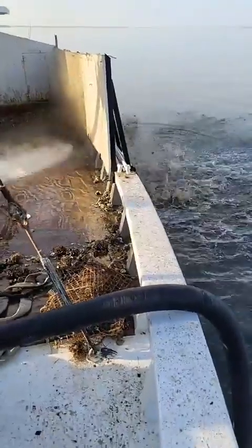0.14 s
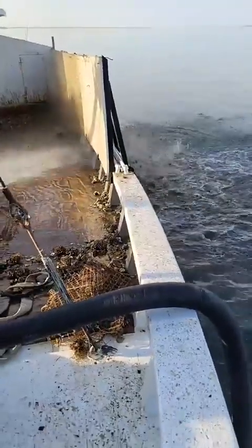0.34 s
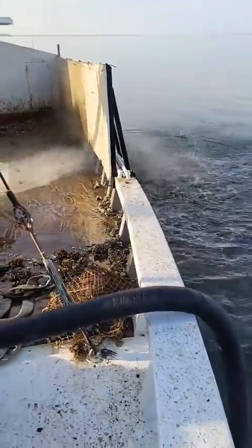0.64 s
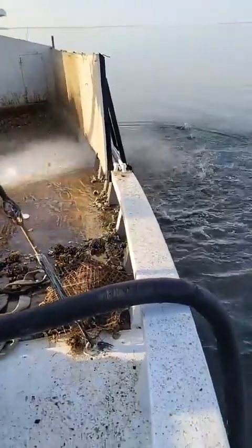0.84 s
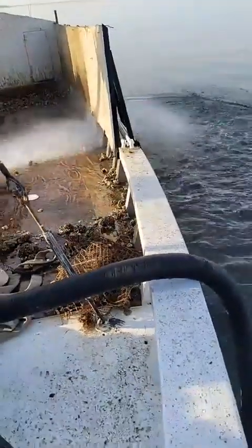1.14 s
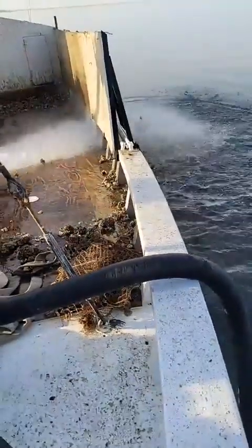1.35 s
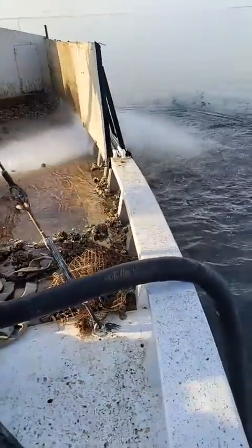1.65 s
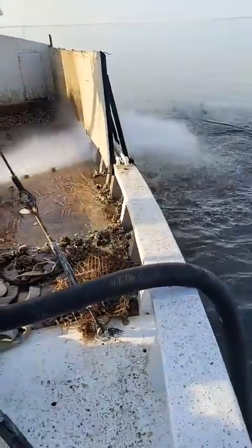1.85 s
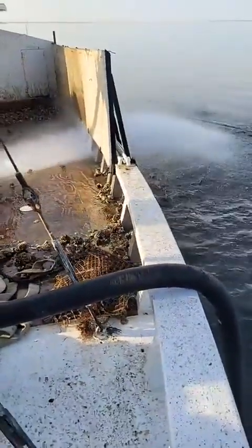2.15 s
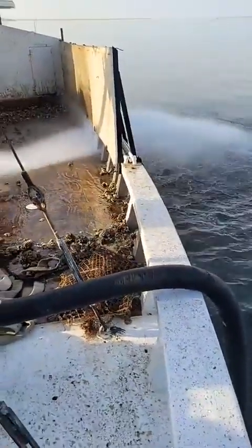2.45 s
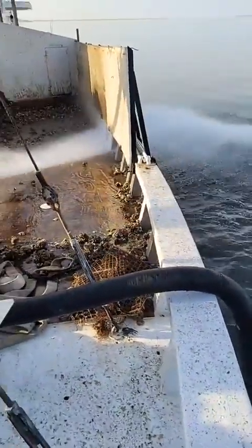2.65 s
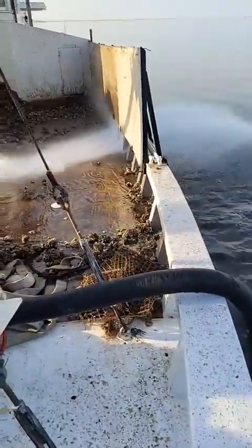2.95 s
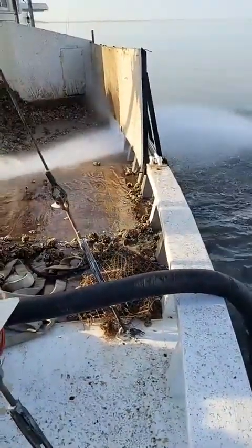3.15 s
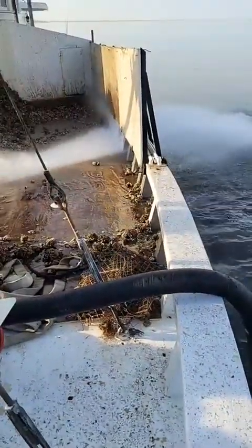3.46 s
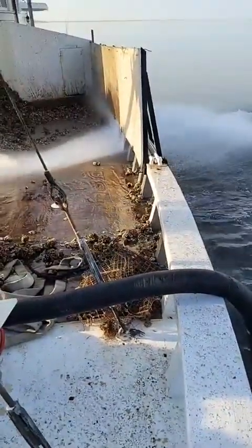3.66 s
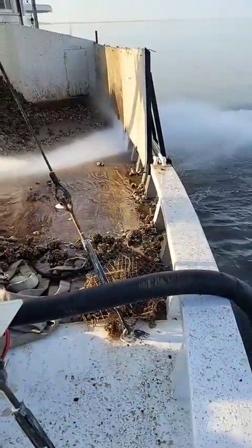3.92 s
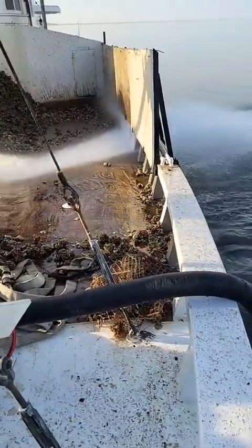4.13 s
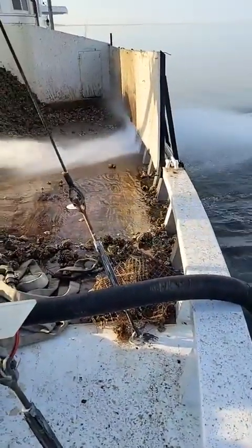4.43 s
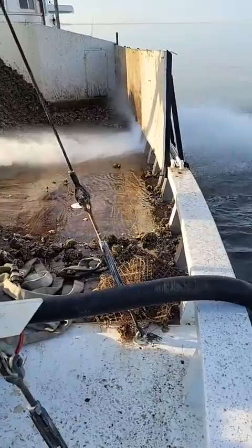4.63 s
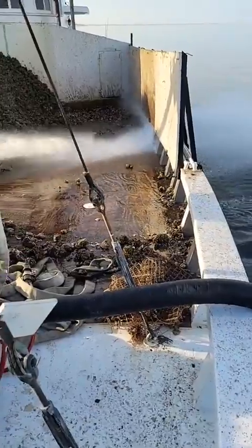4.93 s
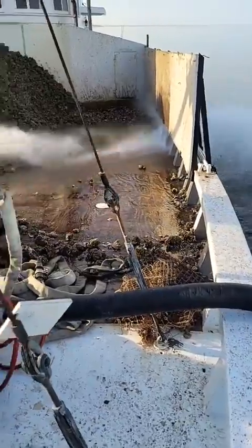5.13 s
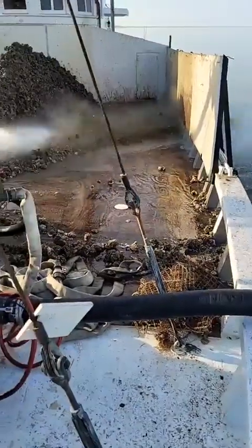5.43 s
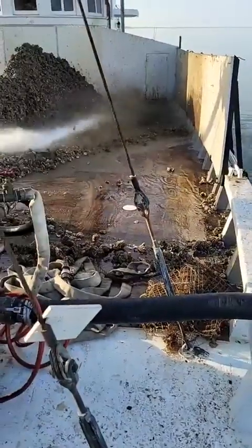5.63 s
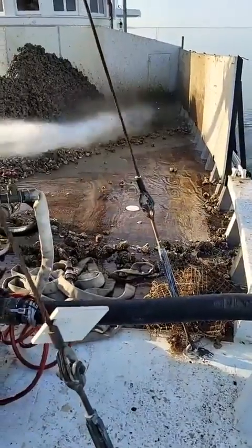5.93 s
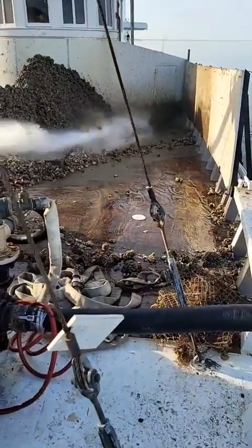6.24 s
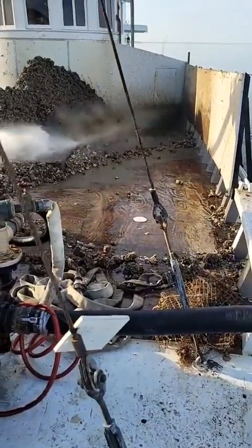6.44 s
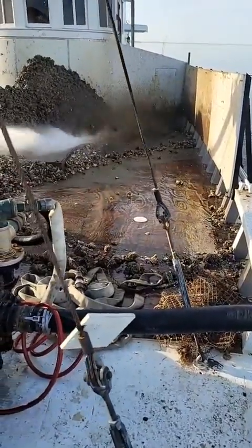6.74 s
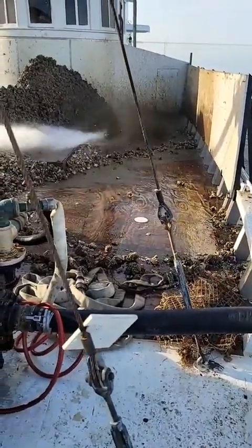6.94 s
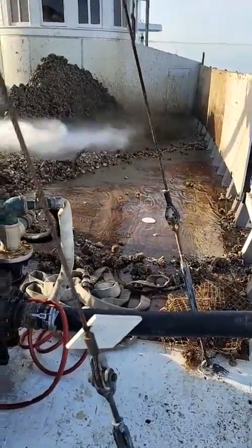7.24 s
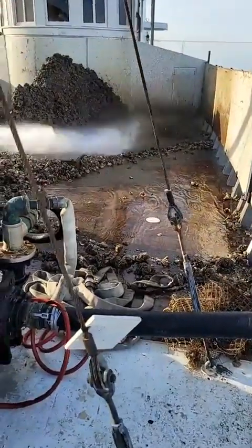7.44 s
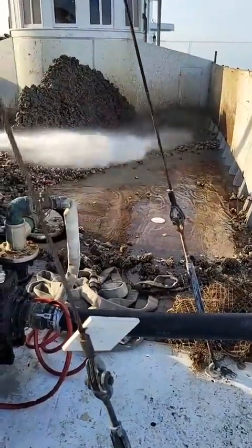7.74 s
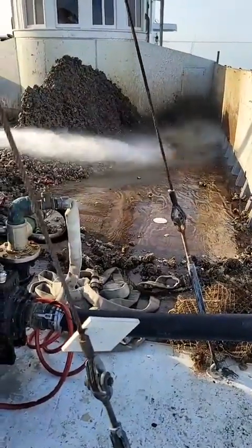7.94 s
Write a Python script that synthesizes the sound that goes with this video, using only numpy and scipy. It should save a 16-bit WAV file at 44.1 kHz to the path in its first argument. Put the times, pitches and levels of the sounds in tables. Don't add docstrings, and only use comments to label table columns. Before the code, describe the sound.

Rough diesel engine dips and catches, barks up to speed, then drones steadily with knocking, rattling plates and a high-pressure water hiss.

```python
import sys
import numpy as np
from scipy import signal
from scipy.fft import rfft, irfft, next_fast_len
from scipy.io import wavfile
from scipy.ndimage import uniform_filter1d, map_coordinates

SR = 44100
rng = np.random.default_rng(int(sys.argv[2]) if len(sys.argv) > 2 else 0)


def gain_from_db(level_db):
    decades = np.asarray(level_db, float) / 20
    return 10 ** decades


def to_wav(s):
    ch = np.atleast_2d(s).T
    pcm = np.round(np.clip(ch, -1, 1) * 32767)
    wavfile.write(sys.argv[1], SR, pcm.astype(np.int16))


N = 356328
STEP = 64
GOVERNED_HZ = 62.6

# time in seconds, firings per second in Hz.
SPEED_RUN_UP = [
    (0.0, 53.9),
    (0.184, 47.3),
    (0.4, 40),
    (0.6, 46.25),
    (0.68, 46.4),
    (1.172, 45.86),
    (1.498, 57.4),
    (1.744, 63.54),
    (1.8, 63.2),
]
# time in seconds, firings per second in Hz.
SPEED_HELD = [
    (1.9, 62.9),
    (2.3, 62.75),
    (2.9, 62.6),
    (6, 62.6),
    (8.08, 62.45),
]
# time in seconds, effort in dB.
EFFORT = [(0, -20.5), (.07, -19.5), (.3, -25), (.39, -26.5), (.47, -19), (.65, -19.5), (.8, -21.5),
          (.89, -22.5), (1.09, -15.5), (1.17, -16.5), (1.26, -10.5), (1.43, -11.5), (1.56, -11.5),
          (1.85, -13.5), (2.62, -14), (3.13, -12), (8.08, -12.3)]
# time in seconds, bark in dB.
BARK = [
    (0, 5.5),
    (.15, -2.5),
    (.46, -2),
    (.8, -5.5),
    (1.18, -1.5),
    (1.24, 5.5),
    (1.55, 9),
    (1.85, -2.5),
    (3, -1),
    (8.08, -2.5),
]
# time in seconds,
# force in dB.
JET_FORCE = [(0.0, -31), (0.02, -34), (0.06, -29), (0.13, -32), (0.38, -34), (0.45, -31), (0.85, -34.5),
             (1.12, -27), (1.17, -29), (1.24, -21.5), (1.55, -26), (1.6, -24.5), (1.82, -28), (2.65, -28.5),
             (3.08, -26.5), (4.97, -27), (5.54, -26.5), (8.08, -27)]
# time in seconds, level under the rattle in dB.
WHINE_LEVEL = [(0, -24), (2.1, -25), (2.5, -16), (4.6, -18), (5.6, -23), (6.2, -25), (8.08, -32)]

CYLINDER_PULSES = [
    -8,
    4,
    0.5,
    5,
]
# multiple of the four-
# firing cycle, level in dB.
EXHAUST_ORDERS = [(1, -46), (2, -44), (3, -88), (4, 0), (5, -28), (6, -25.5), (7, -18), (8, -10),
                  (9, -17.5), (10, -42), (11, -16.5), (12, -13.5), (13, -17), (14, -31.5), (15, -12),
                  (16, -1.5), (17, -108), (18, -17), (19, -15.5), (20, -20.5), (21, -14.5), (22, -20),
                  (23, -19.5), (24, -17), (25, -37), (26, -24.5), (27, -32.5), (28, -47), (29, -26),
                  (30, -39),
                  (31, -32.5), (32, -22), (33, -46), (36, -32), (37, -30.5), (39, -38.5), (40, -30),
                 (41, -32), (44, -33), (49, -41), (55, -27.5), (59, -30.5), (67, -32), (75, -30), (77, -36),
                 (84, -34.5), (88, -28), (109, -33), (126, -29), (130, -31), (136, -39)]

# frequency in Hz, level over the effort in dB.
PIPE_FIRST = [(40.3, -10), (42, -4), (46, -4), (48.5, -4), (51, -2), (58, -2), (63, -2)]
# frequency in Hz, level over the effort in dB.
PIPE_SECOND = [(82, -4), (88, -8), (93, -6.5), (98, -6.5), (103, -21.5), (110, -9), (116, -10),
               (122, -20.5)]
# frequency in Hz, level over the effort in dB.
PIPE_THIRD = [(123, -18), (136, -15), (139, -21), (146, -9), (158, -14), (188, -19.5)]
# firing rate in Hz, level over the effort in dB.
DRONE_LEVEL = [(41, -5), (46, -3), (48.5, -4), (51, -4), (57, -5.5), (63, -3.5)]
# frequency in Hz, gain in dB.
PIPE_RESONANCE = [(20, -14), (60, -8), (100, -4), (140, 1), (185, -4), (225, 3.5), (250, 8), (330, 2),
                  (380, 2), (430, -18), (480, -7.5), (600, -17.5)]
# frequency in Hz, level in dB per Hz.
FLOW_SPECTRUM = [(12, -40), (25, -20), (60, -6), (85, -10.5), (110, -3), (150, -10.5), (250, -9.5),
                 (320, -1), (420, -12), (520, -24.5), (800, -72)]
# frequency in Hz, level in dB per Hz.
HEAD_SPECTRUM = [(400, -54), (600, -12), (900, -2), (1200, 2), (1700, -3), (2150, 2), (2800, -4.5),
                 (3400, -23), (5000, -60)]
# frequency in Hz, level in dB per Hz.
BLOCK_SPECTRUM = [(300, -58), (420, -10.5), (520, -13.5), (620, 0), (700, -3.5), (765, 1.5), (810, -5),
                  (1180, -10), (1600, -9.5), (1700, -5), (1820, -11.5), (2120, -7.5), (3200, -28),
                  (4200, -44), (7000, -120)]
# frequency in Hz, level in dB.
HOUSING_RING = [(3750, -46), (3960, -4), (4000, 7.5), (4050, 0), (4100, 6), (4300, -40)]
# frequency in Hz, level in dB per Hz.
JET_SPECTRUM = [(1300, -28), (2200, -16), (2820, -7), (3700, -8.5), (4000, -8.5), (4300, -7.5),
                (6260, -11.5), (7000, -17.5), (7500, -21), (9450, -14.5), (11500, -16.5), (13700, -24),
                (15100, -24), (15750, -16.5)]
# frequency in Hz, level in dB per Hz.
DROP_SPECTRUM = [(2000, -40), (5000, -2), (9000, -12), (13000, -7), (15700, -5), (17000, -40)]
# lower edge in Hz, upper edge in Hz, share lost from 0 to 1.
DROPOUT_BANDS = [
    (7060, 7390, 1),
    (13830, 14200, .95),
]


def unit(x):
    return x / np.sqrt(np.mean(x ** 2) + 1e-20)


def along(points, hz):
    f, v = np.transpose(points)
    return np.interp(np.log(hz + 1), np.log(f + 1), v)


def curve(rows):
    s, v = np.transpose(rows)
    return np.interp(np.arange(N) / SR, s, v)


def wobble(rate):
    knots = rng.standard_normal(int(N * rate / SR) + 4)
    return map_coordinates(knots, [np.arange(N) * rate / SR], order=1)


def slow_wobble(rate):
    knots = rng.standard_normal(int(N * rate / SR) + 4)
    return np.interp(np.arange(0, N, STEP) * rate / SR, np.arange(len(knots)), knots)


def fill(v):
    return np.interp(np.arange(N), np.arange(0, N, STEP), v)


def coloured(x, spectrum):
    m = next_fast_len(N + 8192)
    gain = gain_from_db(along(spectrum, np.fft.rfftfreq(m, 1 / SR)))
    return unit(irfft(rfft(x, m) * gain, m)[:N])


def patchy(depth_db):
    z = signal.stft(rng.standard_normal(N), nperseg=512)[2]
    field = uniform_filter1d(rng.standard_normal(z.shape), size=14, axis=0)
    field = uniform_filter1d(field, size=5, axis=1)
    return signal.istft(z * gain_from_db(depth_db * unit(field)), nperseg=512)[1][:N]


def puffs(firings, lead, rise, depth_db, scatter_db):
    place = (firings + lead) % 1
    shape = np.minimum(place / rise, (1 - place) / (1 - rise))
    size = rng.standard_normal(int(firings[-1]) + 3)[(firings + lead).astype(int)]
    return gain_from_db((depth_db + scatter_db * size) * shape)


def firing_tones(rate_hz, firings, cycle, slack, effort_db):
    first_db = effort_db + 0.24 * (effort_db + 12) + along(PIPE_FIRST, rate_hz)
    second_db = effort_db + along(PIPE_SECOND, 2 * rate_hz)
    third_db = effort_db + along(PIPE_THIRD, 3 * rate_hz)
    tones = gain_from_db(first_db + 0.18 * wobble(11)) * np.cos(2 * np.pi * firings)
    tones += gain_from_db(second_db + 1.2 * wobble(8)) * np.cos(8 * cycle - 7 * fill(slack))
    tones += gain_from_db(third_db + 0.9 * wobble(6.5)) * np.cos(12 * cycle + 6 * fill(slack))
    return np.sqrt(2) * tones


def pipe_drone(rate_hz, cycle, slack, bark_db):
    pattern = np.angle(np.fft.fft(gain_from_db(CYLINDER_PULSES)))
    drone = np.zeros(N)
    for k, db in EXHAUST_ORDERS:
        if k in (4, 8, 12):
            continue
        sway, swell = slow_wobble(9), slow_wobble(9)
        hz = k * rate_hz[::STEP] / 4
        off_speed_db = along(PIPE_RESONANCE, hz) - along(PIPE_RESONANCE, k * GOVERNED_HZ / 4)
        edge_db = bark_db[::STEP] * np.exp(-((hz - 385) / 140) ** 4)
        slip = (.06 + .003 * k + .6 * slack) * sway + 20 * slack * rng.standard_normal()
        size = gain_from_db(db + off_speed_db + edge_db + (.9 + 4 * slack) * swell)
        drone += fill(size) * np.cos(k * cycle + pattern[int(k) % 4] + fill(slip))
    return drone / np.sqrt(uniform_filter1d(drone ** 2, size=SR // 4))


def exhaust_flow(firings):
    gas = coloured(patchy(depth_db=1.2), FLOW_SPECTRUM)
    return unit(puffs(firings, .2, .3, depth_db=2, scatter_db=1) * gas)


def exhaust(rate_hz, firings, bark_db):
    effort_db = curve(EFFORT)
    cycle = np.pi / 2 * (firings + 0.039)
    slack = 1 - rate_hz[::STEP] / GOVERNED_HZ
    rough_db = np.interp(rate_hz, [46, 58, 62], [-9, -13, -12])
    body = gain_from_db(-0.42) * pipe_drone(rate_hz, cycle, slack, bark_db) + gain_from_db(rough_db) * exhaust_flow(firings)
    tones = firing_tones(rate_hz, firings, cycle, slack, effort_db)
    return tones + gain_from_db(effort_db + along(DRONE_LEVEL, rate_hz)) * body


def knock(firings):
    starts = np.flatnonzero(np.diff((firings + .3).astype(int)))
    t = np.arange(SR // 8) / SR
    blows = np.zeros((4, N))
    blows[np.arange(len(starts)) % 4, starts] = gain_from_db(0.97 * rng.standard_normal(len(starts)))
    decay = gain_from_db(-60 * t / 0.053) + 0.22 * gain_from_db(-60 * t / 0.22)
    rings = rng.standard_normal((4, len(t))) * decay
    return coloured(signal.fftconvolve(blows, rings, axes=1)[:, :N].sum(axis=0), HEAD_SPECTRUM)


def whine():
    return gain_from_db(curve(WHINE_LEVEL) + .5 * wobble(7.9)) * coloured(rng.standard_normal(N), HOUSING_RING)


def rattle(firings, force_db, bark_db, gust):
    shake = puffs(firings, 0.48, 0.28, 3.0 + 0.41 * bark_db, scatter_db=1.1)
    shake = shake * gain_from_db(0.88 * gust + 0.72 * wobble(400))
    plates = coloured(shake * patchy(depth_db=.8), BLOCK_SPECTRUM)
    body = gain_from_db(-0.5) * plates + gain_from_db(-6.0 + 0.68 * bark_db) * knock(firings) + whine()
    return gain_from_db(force_db + 0.5 - 0.3 * bark_db) * body


def drops(per_s):
    chance = rng.random((2, N))
    ticks = (chance[0] < per_s / SR) * np.log(chance[1] + 1e-9)
    return coloured(ticks, DROP_SPECTRUM)


def water_jet(firings, force_db, bark_db, gust):
    pulse = puffs(firings, 0.37, 0.3, 6.0 + .5 * bark_db, scatter_db=0.5)
    pulse = pulse * gain_from_db(0.19 * gust + 0.57 * wobble(900))
    spray = coloured(pulse * patchy(depth_db=1.2), JET_SPECTRUM) + gain_from_db(-18) * drops(per_s=500)
    mean_force_db = -23.5
    hiss_db = mean_force_db + 0.96 * (force_db - mean_force_db) - 5.0
    return gain_from_db(hiss_db - 0.085 * bark_db) * spray


def scene():
    rate_hz = curve(SPEED_RUN_UP + SPEED_HELD)
    firings = np.cumsum(rate_hz) / SR + .3
    bark_db, force_db = curve(BARK), curve(JET_FORCE)
    gust = wobble(25)
    mix = exhaust(rate_hz, firings, bark_db)
    mix += rattle(firings, force_db, bark_db, gust)
    mix += water_jet(firings, force_db, bark_db, gust)
    return mix[None]


def band_limit(x):
    return signal.sosfilt(signal.butter(12, 15900, fs=SR, output="sos"), x)


def record(dry):
    x = dry / (1 + np.abs(dry / .99) ** 8) ** (1 / 8)
    hz = np.fft.rfftfreq(N, 1 / SR)
    open_s, shut_s = .05, .125
    spread = np.array([[.25], [.6]])
    spans = np.array([[open_s], [shut_s]]) * np.exp(spread * rng.standard_normal((2, 100)))
    shut = np.searchsorted(np.cumsum(spans.T), np.arange(N) / SR) % 2
    shut = uniform_filter1d(uniform_filter1d(1. * shut, size=500), size=500)
    lost = sum(share * (hz > lo_hz) * (hz < hi_hz) for lo_hz, hi_hz, share in DROPOUT_BANDS)
    limited = irfft(rfft(x) * (hz < 15735), N)
    dropped = irfft(rfft(x) * np.minimum(lost, 1), N)
    return band_limit(limited - shut * dropped)


dry = scene()
out = record(dry)
to_wav(out)
```